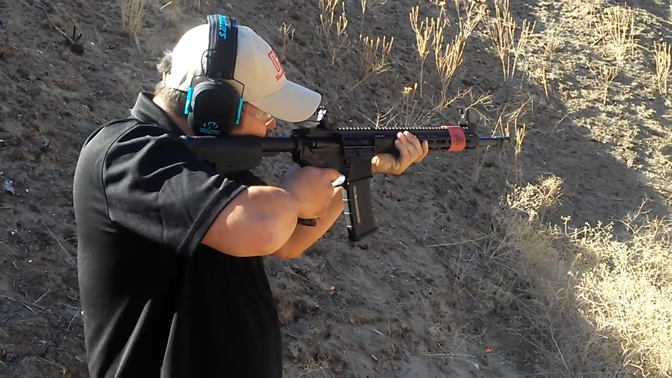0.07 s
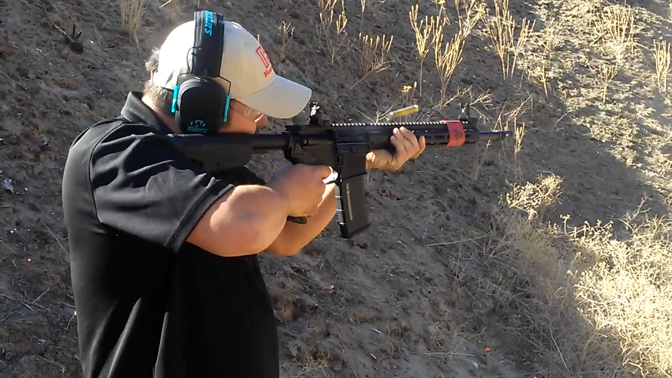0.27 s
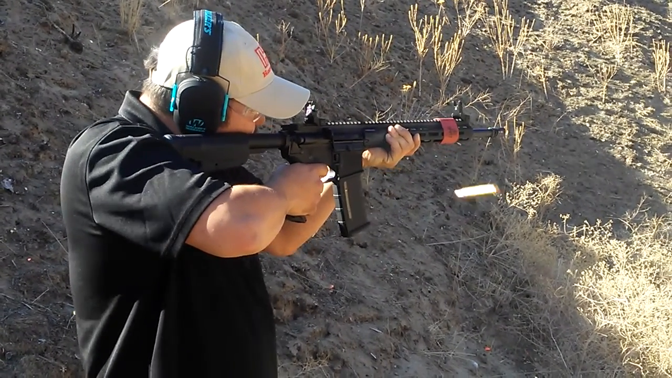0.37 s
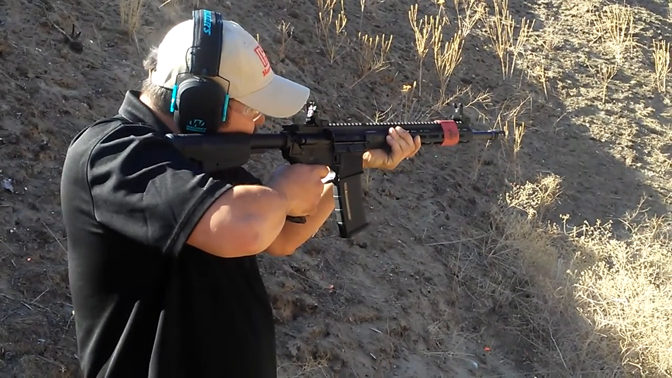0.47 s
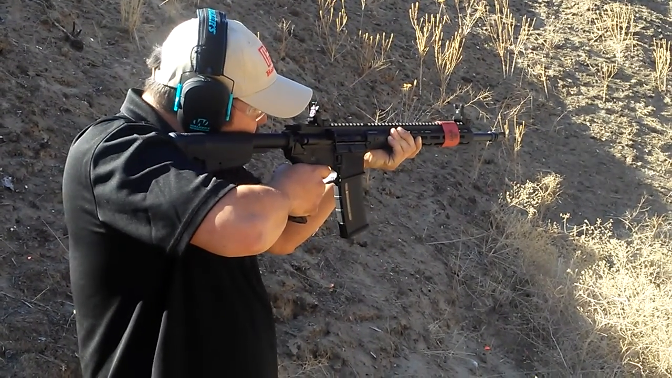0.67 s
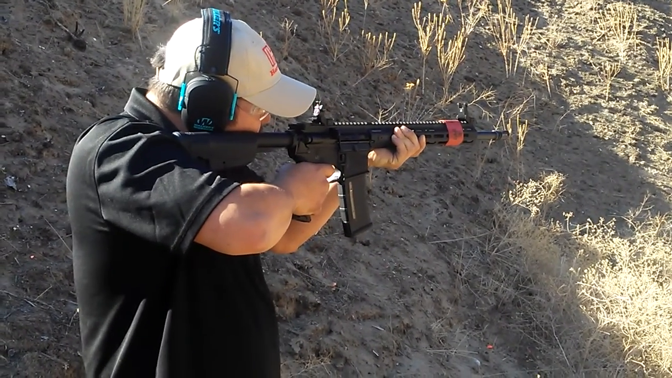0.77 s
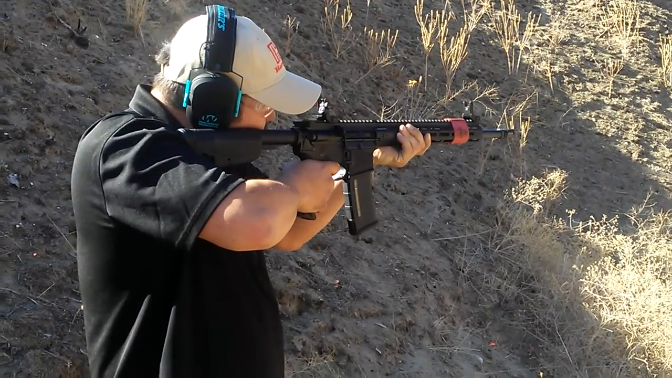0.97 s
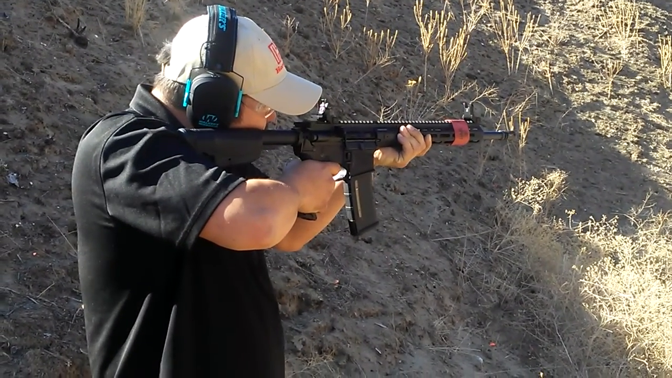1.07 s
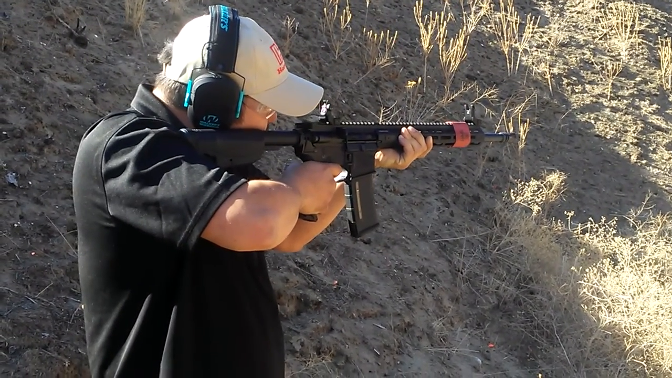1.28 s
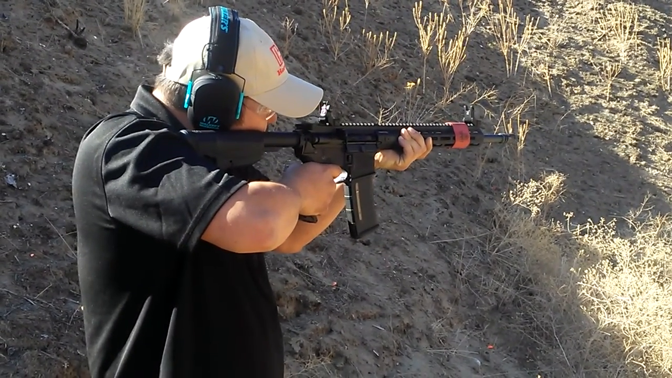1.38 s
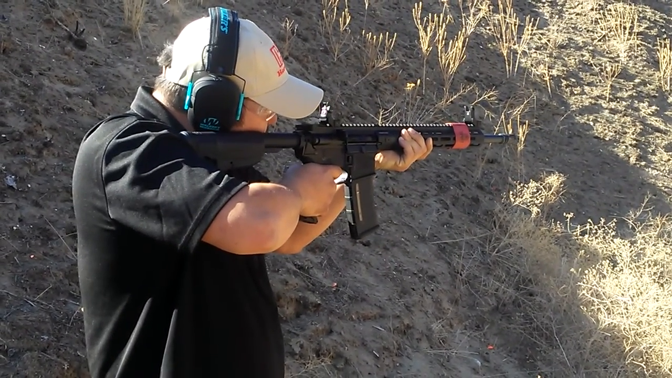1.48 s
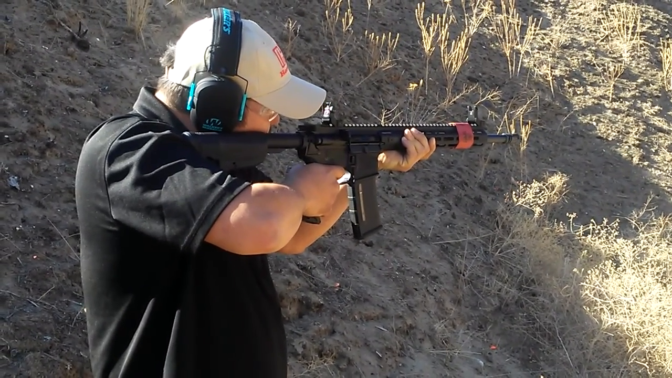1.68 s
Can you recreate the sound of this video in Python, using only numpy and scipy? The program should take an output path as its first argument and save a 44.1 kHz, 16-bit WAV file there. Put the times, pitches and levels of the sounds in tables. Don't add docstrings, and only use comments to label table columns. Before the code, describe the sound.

A rifle fires once, close and distorted, after a faint low rumble; the bolt clacks, echoes slap off rock and slopes, growing duller, and a far hill answers softly. Open range, small overloaded camera microphone.

```python
import sys
import numpy as np
from scipy import signal
from scipy.fft import rfft, irfft
from scipy.io import wavfile
from scipy.ndimage import uniform_filter1d, map_coordinates

SR = 44100
rng = np.random.default_rng(int(sys.argv[2]) if len(sys.argv) > 2 else 0)


def log_audio(samples):
    frames = np.atleast_2d(samples).T
    limited = np.clip(frames, -1, 1)
    pcm = np.round(limited * 32767).astype(np.int16)
    wavfile.write(sys.argv[1], SR, pcm)


def ratio(d):
    e = np.asarray(d, float) / 20
    return 10 ** e


N = 77175
TIME = np.arange(N) / SR

EARLIER_SHOT_S, HAMMER_S, PRIMER_S, SHOT_S = -1.3, .1948, .1998, .2022
PRIMER_DB = -3
BLAST_DB, BLAST_S = 14, .0003
GROUND_DB, GROUND_T60_S, GROUND_RISE_S = 16, .16, .0049
AIR_DB_PER_S, AIR_HZ, AIR_POWER = 17.5, 4000, .7
HILL_AIR_DB_PER_S = 2.5
LUMPY_DB, PATCHY_DB = .8, 1.5
THUMP_SAG, THUMP_SKEW = .078, .55
CLACK_DB, CLACK_T60_S = 7, .03
FACE_LOSS_DB = 15
BREEZE_DB, HISS_DB = -67.5, -68
OVERLOAD_LEVEL, OVERLOAD_KNEE, LOW_CUT_HZ = .93, 6, 22

# start_s, level_db
RUMBLE_LEVEL = [(0, -50.5), (.9, -50), (1.15, -48), (1.4, -61), (1.75, -70)]
# pitch_hz, level_db
RUMBLE_COLOUR = [(20, -41), (50, -1.5), (130, -4), (250, -22), (2500, -39.5), (15000, -80)]
# pitch_hz, level_db
BREEZE_COLOUR = [(300, -23.5), (2500, -0.5), (5500, -1.5), (15000, -9)]
# start_s, level_db
HILL_LEVEL = [(0, -42), (.13, -38.5), (.2, -39.5), (.9, -63), (1.15, -47.5), (1.2, -43.5), (1.3, -42),
              (1.44, -38.5), (1.6, -46.5), (1.75, -52)]
# pitch_hz, level_db
HILL_COLOUR = [(24, -46.5), (40, -12), (118, -8), (163, -22), (204, -8), (687, -2.5), (813, -7.5),
               (2150, -11.5), (3500, -58), (4550, -78), (7700, -120)]
# start_s, level_db, pitch_hz, length_s
THUMPS = [
    (.128, -38, 59, .075),
    (0.215, -7, 55, .06),
    (0.362, -20, 94.6, 0.052),
    (0.889, -24, 249, 0.0117),
    (1.167, -30.5, 59.6, 0.087),
]
# start_s, level_db
ROLL_LEVEL = [(.203, -82), (.25, 3), (.4, -27), (.6, -29), (.72, -27.5), (.8, -27), (.86, -40),
              (1.1, -49.5), (1.4, -55.5), (1.75, -50)]
# pitch_hz, level_db
ROLL_COLOUR = [(60, -30), (130, -6.5), (320, 1.5), (520, -6), (800, -10), (1200, -52.5), (3000, -120)]
# pitch_hz, level_db, t60_s
HAMMER_MODES = [(1600, -26, .012), (2600, -16, .015), (5100, -17, .01), (3500, -24, .012),
                (9000, -30, .004), (13500, -22, .004)]
# pitch_hz, level_db, t60_s
BARREL_MODES = [(1943, 25.5, 0.022), (620, 15, .05), (3640, 7, .04)]
# pitch_hz, level_db
GROUND_COLOUR = [(30, -35.5), (150, -16), (300, 5.5), (600, -1.5), (2000, -4.5), (4500, -18), (7000, -21.5),
                 (15000, -30)]
# start_s, level_db
SLOPE_LEVEL = [(.203, 2), (.3, -7.5), (.42, -11), (.52, -17), (.64, -24.5), (.79, -24.5), (.825, -31),
               (.855, -41.5), (1.1, -54)]
# pitch_hz, level_db
SLOPE_COLOUR = [(30, -28), (80, -4.5), (300, -1.5), (1300, -4), (2800, -14), (4200, -12), (6000, -26.5),
                (15600, -37.5)]
# start_s, level_db
BOLT_CLACKS = [
    (.2865, -14),
    (.292, -27),
    (.363, -33),
    (.369, -40),
]
# pitch_hz, level_db, t60_s
BOLT_MODES = [(5200, -5.5, .03), (7000, 3.5, .02), (8600, 1.5, 0.022), (10200, -3, 0.02035),
              (11800, 0.5, .02), (13600, 5, .015), (15000, -1, .012)]
# pitch_hz, level_db
CLACK_COLOUR = [(2000, -30), (5000, -2), (8000, 0), (14000, 2), (16000, 0)]
# start_s, peak_db, length_s, pitch_hz
ROCK_FACES = [(0.416, -28, .012, 700), (0.445, -20, 0.018, 1880), (0.565, -24, 0.0095, 1860),
              (0.604, -17.5, 0.0085, 1290), (0.605, -36, 0.014, 4000), (.623, -26, 0.011, 1720),
              (0.625, -30.5, 0.011, 3300), (0.654, -41, 0.0072, 3920), (0.676, -21.5, 0.019, 840),
              (0.755, -31.5, 0.021, 1310), (0.774, -24.5, 0.015, 447), (0.893, -41.5, .008, 1190),
              (0.895, -54, 0.088, 1520), (1.19, -43.5, .04, 1020), (1.349, -47, 0.023, 1020),
              (1.439, -38, 0.017, 580)]
# start_s, pitch_hz, length_s, level_db
CHIRPS = [
    (1.28, 3450, .04, -75),
    (1.36, 4100, .03, -74),
    (1.45, 4050, .035, -74),
]
# pitch_hz, level_db
MIC_RESPONSE = [(20, 1), (6000, 0), (7300, -19), (9000, -11.5), (16000, -20.5)]


def unit(x):
    return x / np.sqrt(np.mean(x ** 2) + 1e-20)


def along(points, hz):
    point_hz, level_db = np.transpose(points)
    return np.interp(np.log(hz + 1), np.log(point_hz + 1), level_db)


def curve(rows):
    return np.interp(TIME, *np.transpose(rows))


def wobble(rate_hz):
    knots = rng.standard_normal(int(N * rate_hz / SR) + 4)
    return map_coordinates(knots, [TIME * rate_hz])


def scatter(colour, size_db, lumpy_db, air_db_per_s=0):
    unevenness_db = size_db * wobble(400) + lumpy_db * wobble(45)
    hits = rng.standard_normal(N) * ratio(unevenness_db)
    hz, frame_s, z = signal.stft(unit(hits), SR, nperseg=512)
    patches = uniform_filter1d(rng.standard_normal(z.shape), size=6, axis=0)
    patches = unit(uniform_filter1d(patches, size=4, axis=1))
    travel_s = np.where(frame_s < SHOT_S, frame_s - EARLIER_SHOT_S, frame_s - SHOT_S)
    loss_db = air_db_per_s * np.outer((hz / AIR_HZ) ** AIR_POWER, travel_s)
    loss_db = loss_db + PATCHY_DB * min(lumpy_db, 1) * patches
    x = signal.istft(z * ratio(-loss_db), SR, nperseg=512)[1][:N]
    size = N + 225
    gain = ratio(along(colour, np.fft.rfftfreq(size, 1 / SR)))
    return irfft(rfft(x, size) * gain / np.sqrt(np.mean(gain ** 2)))[:N]


def ring(start_s, modes, rough):
    t = np.clip(TIME - start_s, 0, None)
    onset = 1 - np.exp(-t / .0006)
    out = 0
    for hz, db, t60_s in modes:
        decay = ratio(db - 60 * t / t60_s)
        out = out + decay * onset * np.sin(2 * np.pi * hz * t + rough * wobble(250))
    return out


def rumble():
    return ratio(curve(RUMBLE_LEVEL)) * scatter(RUMBLE_COLOUR, size_db=.7, lumpy_db=1.5)


def breeze():
    return ratio(BREEZE_DB) * scatter(BREEZE_COLOUR, size_db=0, lumpy_db=0)


def hill():
    wash = scatter(HILL_COLOUR, size_db=-1.0, lumpy_db=LUMPY_DB, air_db_per_s=HILL_AIR_DB_PER_S)
    return ratio(curve(HILL_LEVEL)) * wash


def thumps():
    out = 0
    for start_s, db, hz, length_s in THUMPS:
        u = np.clip((TIME - start_s) / length_s, 0, 1)
        swell = np.sin(np.pi * u ** THUMP_SKEW)
        tone = np.sin(2 * np.pi * hz * (TIME - start_s) * (1 - THUMP_SAG * u))
        out = out + ratio(db) * swell * tone
    return out


def rifle():
    hammer = ring(HAMMER_S, HAMMER_MODES, rough=2.5)
    primer = ratio(PRIMER_DB) * ring(PRIMER_S, HAMMER_MODES[::2], rough=2.5)
    u = np.clip(TIME - SHOT_S, 0, None) / BLAST_S
    blast = -ratio(BLAST_DB) * u * (2 - u) * np.exp(-u)
    return hammer + primer + blast + ring(SHOT_S + .0015, BARREL_MODES, rough=.9)


def terrain():
    t = np.clip(TIME - SHOT_S, 0, None)
    rise = 1 - np.exp(-(t / GROUND_RISE_S) ** 2)
    ground = scatter(GROUND_COLOUR, size_db=3.0, lumpy_db=LUMPY_DB)
    ground = ratio(GROUND_DB - 60 * t / GROUND_T60_S) * ground
    slopes = scatter(SLOPE_COLOUR, size_db=1.0, lumpy_db=LUMPY_DB, air_db_per_s=AIR_DB_PER_S)
    return rise * (ground + ratio(curve(SLOPE_LEVEL)) * slopes)


def valley_roll():
    roll = scatter(ROLL_COLOUR, size_db=4.5, lumpy_db=2 * LUMPY_DB)
    return (TIME > SHOT_S) * ratio(curve(ROLL_LEVEL)) * roll


def bolt():
    spray = ratio(CLACK_DB) * scatter(CLACK_COLOUR, size_db=3, lumpy_db=-1)
    out = 0
    for start_s, db in BOLT_CLACKS:
        decay = (TIME > start_s) * ratio(-60 * np.abs(TIME - start_s) / CLACK_T60_S)
        out = out + ratio(db) * (ring(start_s, BOLT_MODES, rough=4.9) + spray * decay)
    return out


def rock_faces():
    octaves = np.arange(-2, 2.1, .5)
    out = 0
    for start_s, db, length_s, hz in ROCK_FACES:
        u = np.clip(TIME - start_s, 0, None) / length_s * 2.78
        swell = np.e * u * np.exp(-u)
        colour = np.c_[hz * 2 ** octaves, -FACE_LOSS_DB * octaves ** 2]
        slap = swell * scatter(colour, size_db=1.5, lumpy_db=0)
        out = out + ratio(db) * unit(slap) * np.sqrt(np.mean(swell ** 2))
    return out


def bird():
    out = 0
    for start_s, hz, length_s, db in CHIRPS:
        swell = np.sin(np.pi * np.clip((TIME - start_s) / length_s, 0, 1))
        out = out + ratio(db) * swell * np.sin(2 * np.pi * hz * TIME + 1.8 * wobble(110))
    return out


def scene():
    background = rumble() + breeze()
    echoes = hill() + thumps() + terrain() + valley_roll() + rock_faces()
    return (background + echoes + rifle() + bolt() + bird())[None]


def top_cut(x):
    return signal.sosfilt(signal.butter(12, 15700, fs=SR, output="sos"), x)


def record(dry):
    taps = irfft(ratio(along(MIC_RESPONSE, np.fft.rfftfreq(256, 1 / SR))), 256)
    taps = np.roll(taps, 128)[None]
    x = signal.fftconvolve(dry, taps, axes=1)[:, 128:128 + N]
    x = x / (1 + np.abs(x / OVERLOAD_LEVEL) ** OVERLOAD_KNEE) ** (1 / OVERLOAD_KNEE)
    low_cut = signal.butter(1, LOW_CUT_HZ, "high", fs=SR, output="sos")
    x = signal.sosfilt(low_cut, x)
    x = x + ratio(HISS_DB) * rng.standard_normal(x.shape)
    return top_cut(x)


dry = scene()
out = record(dry)
log_audio(out)
```